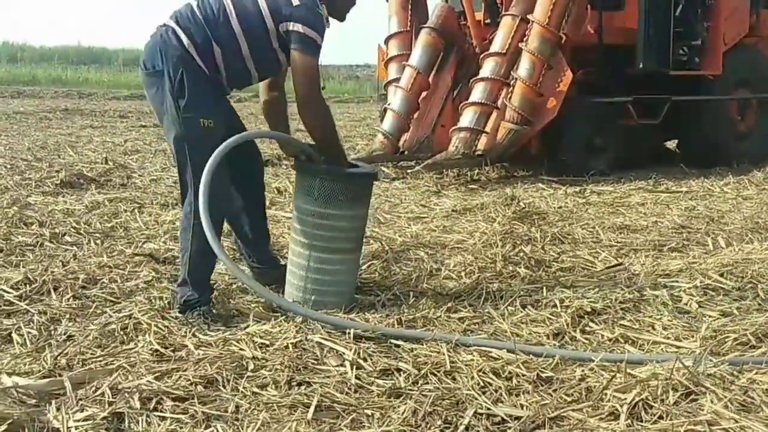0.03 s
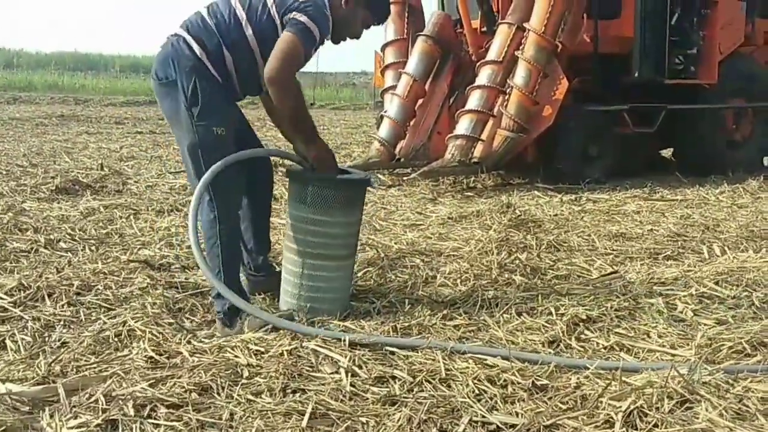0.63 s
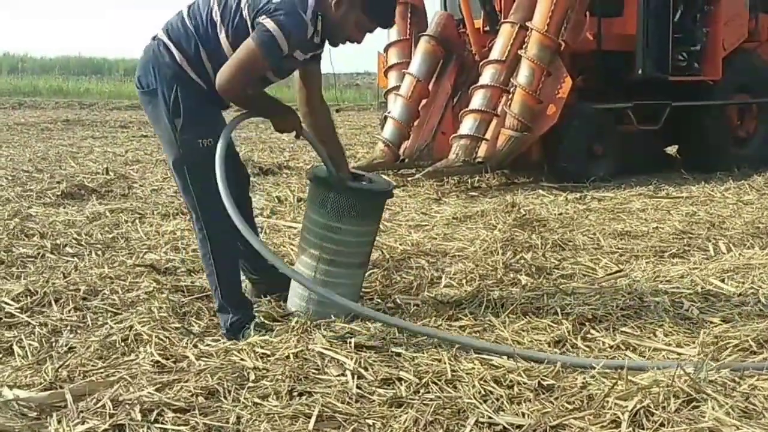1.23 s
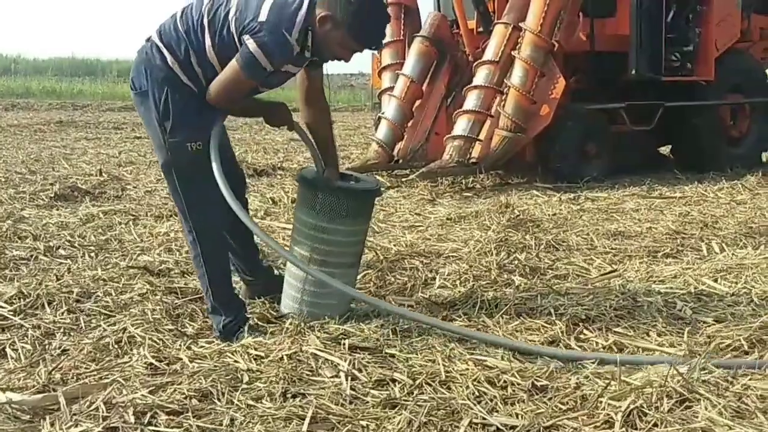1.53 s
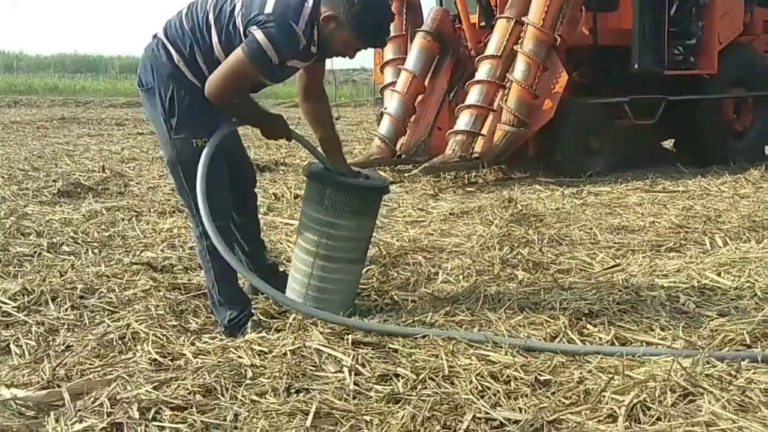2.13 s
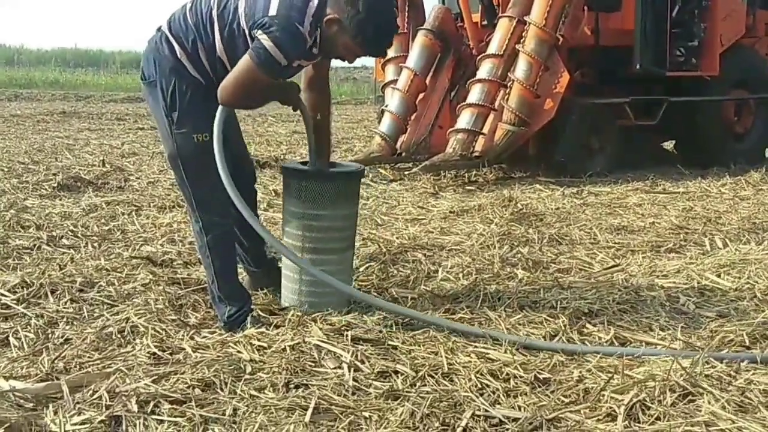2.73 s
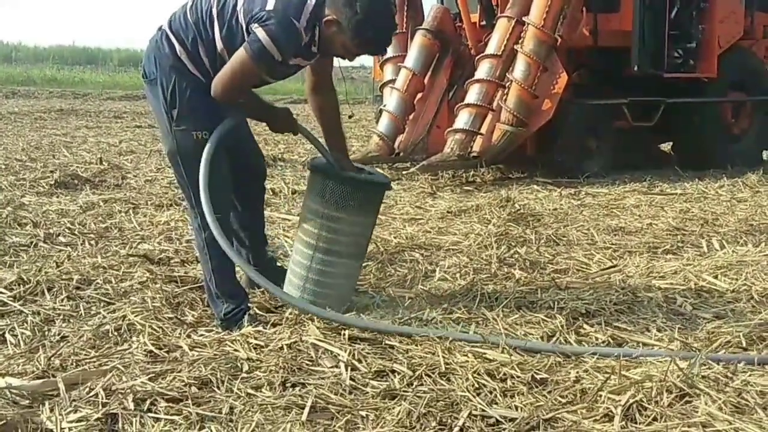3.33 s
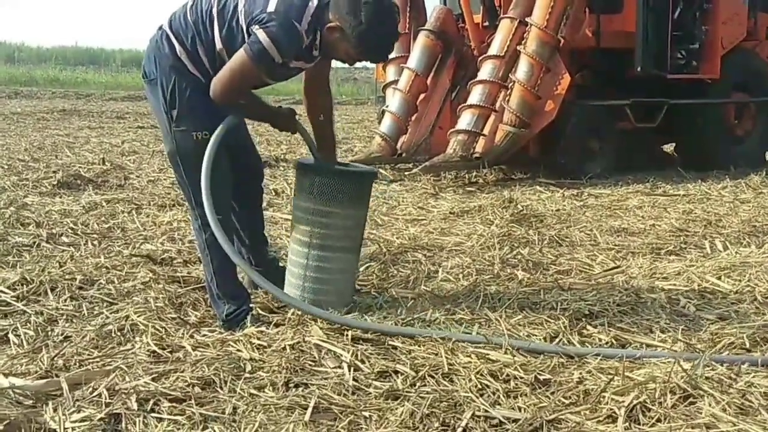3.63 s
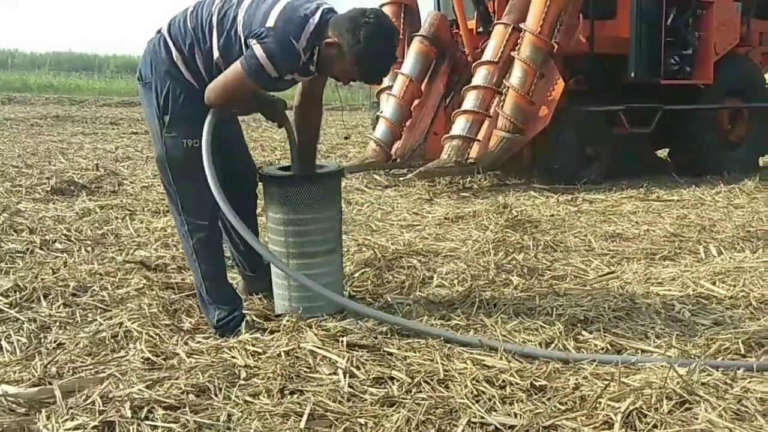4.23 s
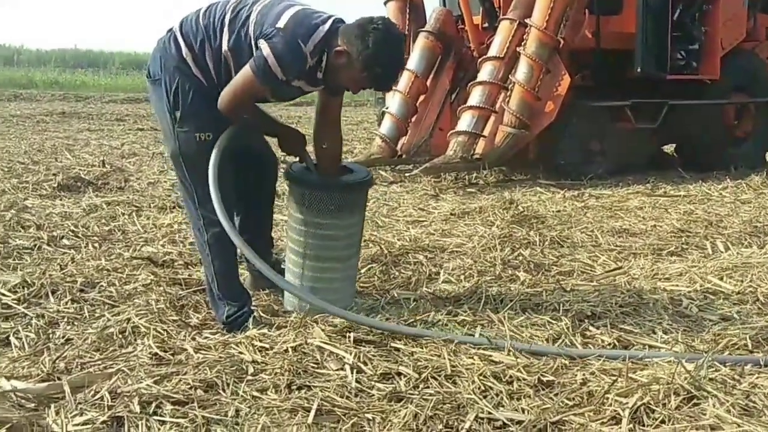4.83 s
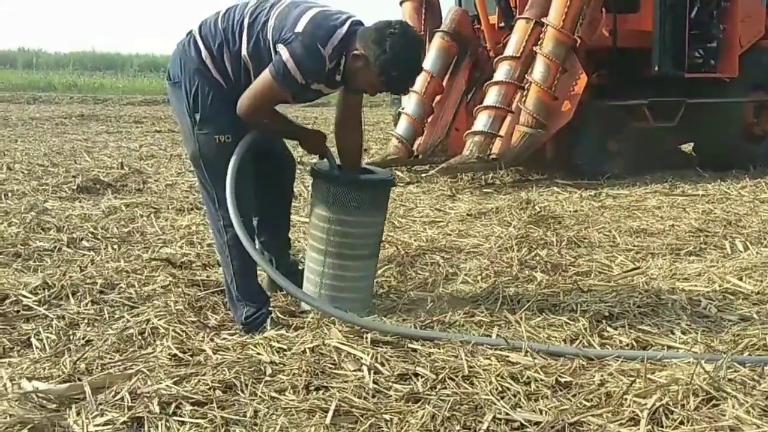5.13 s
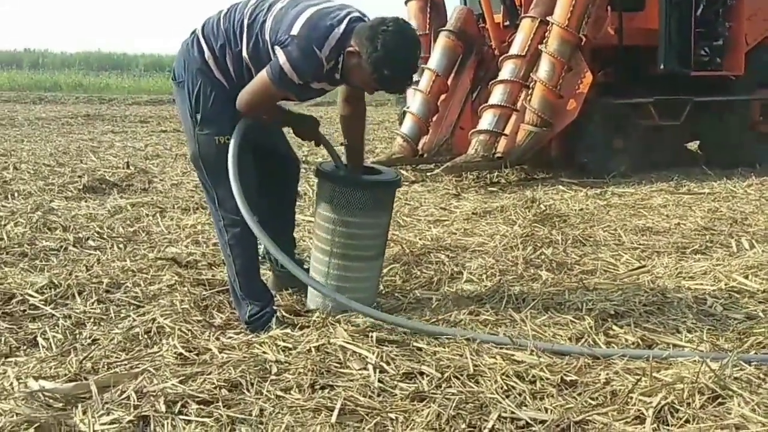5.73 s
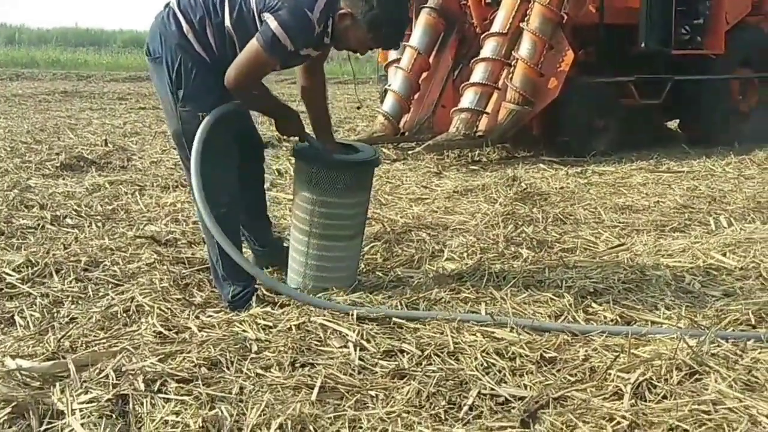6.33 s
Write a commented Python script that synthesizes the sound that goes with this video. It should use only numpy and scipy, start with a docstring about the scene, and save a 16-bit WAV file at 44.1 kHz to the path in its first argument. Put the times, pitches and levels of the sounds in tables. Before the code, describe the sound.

Compressed air hisses loudly through a large cylindrical filter, surging and whistling, while a compressor thumps and a diesel engine idles behind.

```python
"""An air hose blows out a big cylindrical filter in an open field, a few metres away. From the start
a piston compressor thumps and a harvester's six-cylinder diesel idles behind it, and three short low
hoots sound near 610 Hz. The jet hisses on the pleats and surges at 1.2 s. From 1.5 s it whistles in
short, high clusters where it grazes an edge. Near 2.7 s, and again from 4.9 to 5.7 s, it reaches deep
into the drum and the hollow roars. Two last whistles sound at 6.5 s."""
import sys
import numpy as np
from scipy import signal
from scipy.fft import rfft, irfft
from scipy.io import wavfile
from scipy.ndimage import uniform_filter1d, map_coordinates

SR = 44100
rng = np.random.default_rng(int(sys.argv[2]) if len(sys.argv) > 2 else 0)


def wav_out(sig):
    """Save sig, one row per channel (or a flat mono array), as 16-bit PCM at SR to the path in sys.argv[1]."""
    wavfile.write(sys.argv[1], SR, np.round(np.clip(np.atleast_2d(sig).T, -1, 1) * 32767).astype(np.int16))


N = 289737

# Envelopes of the air as the nozzle is worked round the filter; levels in all tables are relative.
HISS_ENVELOPE = [(0.0, -22), (0.44, -28), (1.1, -26), (1.21, -15), (1.3, -20), (1.34, -13.5), (1.92, -20),
                 (2.08, -20.5), (2.18, -26.5), (2.61, -17), (2.67, -21.5), (2.74, -22), (2.84, -14),
                 (3.0, -16.5), (3.11, -24.5), (3.31, -12.5), (3.48, -26), (3.71, -21), (3.9, -23),
                 (3.95, -19), (4.01, -22), (4.06, -16), (4.15, -16), (4.21, -11.5), (4.3, -18), (4.94, -17),
                 (5.01, -22.5), (5.42, -18.5), (5.6, -13.5), (5.74, -16), (5.78, -14.5), (5.86, -19),
                 (5.93, -14), (6.31, -23), (6.5, -17), (6.57, -22.5)]  # jet striking the filter: t/s, level/dB
PLEAT_ENVELOPE = [(0.0, -23), (0.25, -27.5), (1.01, -29.5), (1.34, -21), (1.5, -27.5), (1.63, -23),
                  (2.1, -29.5), (2.27, -28.5), (2.32, -21), (2.38, -24.5), (2.74, -21.5), (2.87, -16),
                  (3.07, -31), (3.15, -30), (3.29, -17.5), (3.44, -27), (4.01, -25.5), (4.04, -20),
                  (4.76, -28), (5.1, -23.5), (5.36, -26), (5.49, -16), (5.6, -21), (6.02, -23), (6.26, -22),
                  (6.57, -28.5)]  # air passing through the pleats: t/s, level/dB
RIM_ENVELOPE = [(0, -6.5), (1.2, -7), (1.4, -13), (2.3, -7.5), (3.3, -9), (4.0, -11.5), (4.3, -6),
                (5.6, -7), (6.57, -8)]  # spill over the rim, against a blend of pleats and hiss: t/s, level/dB
DEPTH_ENVELOPE = [(0.25, -47.5), (1.59, -44.5), (2.25, -53.5), (2.51, -34.5), (2.57, -41.5), (2.74, -28),
                  (2.91, -41.5), (3.54, -56), (3.59, -44), (4.78, -42.5), (4.88, -31), (5.7, -33),
                  (5.87, -46.5), (6.5, -54.5)]  # jet reaching deep into the drum: t/s, level/dB
BUFFET_ENVELOPE = [(0, -25.5), (1.2, -30), (2.4, -32.5), (3.45, -29), (3.9, -24.5), (4.8, -35),
                   (5.25, -25.5), (6.1, -33), (6.57, -36.5)]  # low buffeting: t/s, level/dB

# Spectral densities of the flow noise.
HISS_SPECTRUM = [(3400, -22.5), (3850, -12), (4150, -2), (4450, 0), (4800, -3), (5200, -1), (5700, -2.5),
                 (6200, -1), (7000, -4), (7450, -9), (7900, -25.5), (8500, -46)]  # jet: f/Hz, level/dB
PLEAT_SPECTRUM = [(900, -22.5), (1300, -6.5), (1550, -6), (1950, 0.5), (2250, -1.5), (2550, -1.5),
                  (2850, -10), (3300, -29)]  # rush through the pleats: f/Hz, level/dB
RIM_SPECTRUM = [(2500, -8.5), (2850, -1.5), (3150, 3), (3400, -2.5), (3650, 4), (3900, -2), (4300, -10)]  # spill over the rim: f/Hz, level/dB
HOLLOW_SPECTRUM = [(550, -20), (750, -18), (950, -8), (1100, 0.5), (1300, -6), (1550, 1), (2000, -27.5)]  # upper resonances of the drum: f/Hz, level/dB
DEPTH_SPECTRUM = [(180, -17), (270, -4.5), (360, -9), (480, 1.5), (620, -1.5), (800, -6), (1100, -14.5)]  # lower resonances of the drum: f/Hz, level/dB
BUFFET_SPECTRUM = [(35, -21.5), (65, -6.5), (95, -1.5), (140, 0), (190, -2.5), (300, -16.5)]  # low buffeting: f/Hz, level/dB

# Three low hoots, then the jet's edge whistles:
# start t/s, duration/s, first f/Hz, last f/Hz, level/dB, octave re fundamental/dB
TONES = [ (-.02, 0.064, 620, 607, -26, -27), (0.086, .065, 613, 602, -26.5, -23),
         (.168, 0.062, 600, 600, -30.5, -26), (1.474, 0.037, 2920, 2420, -20, 2),
         (1.496, .028, 3160, 3000, -20.5, 4), (1.523, 0.044, 2680, 2330, -19.5, 3.5),
         (1.547, 0.026, 2870, 2990, -19.5, 4), (1.652, .043, 2200, 2350, -21, -11),
         (1.698, 0.0385, 2380, 2600, -19.5, -1.5), (1.722, 0.058, 2310, 2190, -21.5, -6),
         (1.836, 0.059, 2740, 3030, -26, -7), (1.879, 0.044, 2750, 3180, -17.5, -9),
         (2.963, .034, 2430, 2530, -13.5, -8.5), (3, 0.033, 2250, 2710, -19.5, 1.5),
         (3.027, .026, 3040, 2970, -22.5, 5), (3.049, .045, 2660, 3280, -26, -10.5),
         (3.148, 0.048, 2560, 3220, -26.5, -12), (3.212, .038, 2900, 2680, -17.5, -10),
         (3.728, .055, 2430, 2230, -23.5, -7), (3.78, .065, 2610, 2380, -28, -8),
         (4.555, .046, 2320, 2620, -21, 6), (4.594, 0.043, 2310, 2640, -15.5, -6),
         (4.65, 0.052, 2700, 3000, -23, -8), (6.471, 0.048, 2630, 2430, -19, -3),
         (6.502, 0.069, 2710, 2750, -21, -9)]
# Airy near-whistles, hoots and spits: start t/s, duration/s, centre f/Hz, bandwidth/Hz, level/dB
EDGE_PUFFS = [(-.01, 0.097, 1520, 450, -24.5), (.736, 0.2, 5400, 450, -32.5),
              (0.99, .013, 5770, 900, -25.5), (1.314, .13, 5320, 2370, -17), (1.6, .07, 1130, 400, -29),
              (2.31, .14, 1210, 450, -31.5), (3.924, 0.073, 4580, 650, -22), (4.023, .07, 1650, 260, -22),
              (4.1, 0.14, 1160, 350, -28), (4.352, 0.098, 6160, 300, -25.5),
              (4.451, 0.031, 1540, 200, -25.5), (4.97, 0.31, 1100, 220, -27),
              (5.47, .075, 1230, 170, -27.5), (5.93, 0.1, 6260, 1000, -21.5)]

# Level at which the machines are heard, dipping and recovering: t/s, level/dB
MACHINE_ENVELOPE = [(0.0, -19), (0.09, -18.5), (1.28, -19.5), (1.3, -22.5), (1.72, -25), (2.76, -21.5),
                    (3.02, -24), (3.51, -23), (3.92, -19.5), (4.83, -25.5), (5.4, -20.5), (6.09, -26.5),
                    (6.55, -23.5), (6.57, -23.5)]
# Line spectrum of the compressor's thump: harmonic number of the stroke rate, level/dB
THUMP_HARMONICS = [(1, -29), (2, -35), (3, -19), (4, -14.5), (5, -6), (6, -15), (7, -13.5), (8, -18),
                   (9, -15), (10, -6), (11, 0.5), (12, -12.5), (13, 2.5), (14, -15.5), (15, -36.5),
                   (16, -21), (17, -12.5), (18, -21.5), (19, -34), (20, -39.5), (21, -32.5), (22, -48.5),
                   (23, -36.5), (24, -23), (25, -20), (26, -22.5), (27, -28.5), (28, -35)]
# Spectral density of the mechanical clatter: f/Hz, level/dB
CLATTER_SPECTRUM = [(330, -22.5), (430, -7.5), (520, -18.5), (630, 2.5), (780, -0.5), (880, 4), (1050, -5),
                    (1600, -1), (2400, -8), (3300, -13), (5000, -21.5), (7200, -19), (8400, -50)]

COMPRESSOR_HZ, SHAFT_HZ = 17.0, 27.3  # piston strokes and diesel shaft turns per second


def jet_hiss(hiss_db, neutral_db=-20.5, dulling_db_per_db=0.18):
    """Turbulent jet noise: a free jet is quiet and bright; the harder it strikes, the duller it is."""
    jet = turbulence(HISS_SPECTRUM, flutter_db=0.84, flutter_hz=37)
    jet = wall_reflection(jet, lag_ms=1.31, sway=0.14, strength=0.26)
    lower = signal.sosfiltfilt(signal.butter(5, 5600, fs=SR, output="sos"), jet)
    upper = jet - lower
    tilt = undb(dulling_db_per_db * (neutral_db - hiss_db))
    hiss = (lower / tilt + upper * tilt) / np.sqrt((tilt ** 2 + tilt ** -2) / 2)
    return hiss * undb(hiss_db + 0.38)


def pleat_rush(pleat_db):
    """Flow noise: air forced through the pleats rushes in the middle of the spectrum."""
    rush = turbulence(PLEAT_SPECTRUM, flutter_db=0.63, flutter_hz=64)
    return wall_reflection(rush, lag_ms=2.582, sway=0.21, strength=0.38) * undb(pleat_db + 0.9)


def wall_reflection(direct, lag_ms, sway, strength):
    """Comb filtering: the drum wall's echo interferes with the direct sound; its path slowly drifts."""
    lag_samples = lag_ms / 1000 * SR * np.exp(sway * walk(1.2))
    echo = map_coordinates(direct, [np.arange(N) - lag_samples], order=3, mode="reflect")
    return unit(direct + strength * echo)


def rim_spill(pleat_db, hiss_db):
    """Edge noise: air spills over the rim, its level following both pleats and hiss."""
    spill_db = between(pleat_db, hiss_db, share=0.34) + envelope(RIM_ENVELOPE)
    return turbulence(RIM_SPECTRUM, flutter_db=1.5, flutter_hz=65) * undb(spill_db)


def drum_roar(pleat_db):
    """Cavity resonance: the deeper the jet reaches, the more the drum roars, most in its low modes."""
    depth_db = envelope(DEPTH_ENVELOPE)
    hollow_db = between(pleat_db, depth_db, share=0.34)
    upper = turbulence(HOLLOW_SPECTRUM, flutter_db=0.5, flutter_hz=37) * undb(hollow_db)
    lower = turbulence(DEPTH_SPECTRUM, flutter_db=0.5, flutter_hz=35) * undb(depth_db + 3.0)
    return upper + lower


def buffeting():
    """Slow pressure fluctuations in the stirred air are heard as a low rumble."""
    rumble = turbulence(BUFFET_SPECTRUM, flutter_db=1.2, flutter_hz=12)
    return rumble * undb(envelope(BUFFET_ENVELOPE) - 0.6)


def hoots_and_whistles():
    """Gliding tones: low hoots, then edge tones, in which a grazing jet locks into oscillation."""
    out, t = np.zeros(N), clock()
    unrest, flutter = walk(1400), undb(3.5 * walk(300))
    for start, length, first_hz, last_hz, db, octave_db in TONES:
        on = (t >= start) & (t < start + length)
        progress = (t[on] - start) / length
        arch = np.sin(np.pi * progress).clip(0)
        hz = (first_hz + (last_hz - first_hz) * progress) * (1 + 0.01 * arch)  # the glide bows upward
        jitter = 0.032 / (1 + 2 * undb(octave_db) ** 2)  # the stronger the octave, the steadier the pitch
        phase = 2 * np.pi * np.cumsum(hz * (1 + jitter * unrest[on])) / SR
        swell = np.sqrt(2 * arch) * flutter[on]
        out[on] += undb(db - 2.0) * swell * (np.sin(phase) + undb(octave_db) * np.sin(2 * phase))
    return out


def hiss_loss_db(full_loss_db=2.5):
    """Attenuation: the hiss dips while a hoot or whistle sounds."""
    t = clock()
    sounding = np.any([(t >= start) & (t < start + length) for start, length, *_ in TONES], axis=0)
    return full_loss_db * uniform_filter1d(sounding.astype(float), size=1300)


def edge_puffs():
    """Narrow-band noise: a jet that only brushes an edge fails to lock into a tone."""
    out, t = np.zeros(N), clock()
    for start, length, hz, width_hz, db in EDGE_PUFFS:
        band = signal.butter(4, [hz - width_hz / 2, hz + width_hz / 2], "bandpass", fs=SR, output="sos")
        progress = ((t - start) / length).clip(0, 1)
        swell = np.sqrt(2 * np.sin(np.pi * progress).clip(0))
        out += undb(db) * swell * unit(signal.sosfilt(band, rng.standard_normal(N)))
    return out


def compressor(machine_db, first_stroke_s=0.0335):
    """Impulse response: each piston cycle gives a thump and, half a cycle later, an opposite-sign rebound, both
    ringing down in the intake pipe."""
    size = 1024  # points per stroke
    harmonics = np.arange(size // 2 + 1)
    harmonic_db = np.interp(harmonics, *np.transpose(THUMP_HARMONICS), left=-50, right=-55)
    # minimum phase: the pipe is causal, so its phases follow from its levels
    cepstrum = irfft(np.log(undb(harmonic_db)))
    cepstrum[1:size // 2] *= 2
    cepstrum[size // 2 + 1:] = 0
    phase_lag = 0.05 * np.maximum(harmonics - 12, 0) ** 2  # the upper ring builds up a little later
    stroke = irfft(np.exp(rfft(cepstrum) - 1j * phase_lag))
    turns = COMPRESSOR_HZ * (clock() - first_stroke_s + 0.000085 * walk(9))
    thumps = -unit(np.interp(turns % 1, np.arange(size) / size, stroke, period=1))
    return thumps * undb(machine_db + 0.37 + 0.5 * walk(25))


def diesel(machine_db, first_firing_s=0.0058, first_squeak_s=0.0017):
    """Periodic excitation: three firings a turn drone and pulse the clatter; each turn squeaks once."""
    t = clock()
    firing_phase = 2 * np.pi * 3 * SHAFT_HZ * (t - first_firing_s)
    drone = np.sin(firing_phase) * undb(-11.0 + 1.2 * walk(6))
    # part of the clatter comes back the same on every compressor stroke
    repeating = np.resize(rng.standard_normal(N)[:int(SR / COMPRESSOR_HZ)], N)
    knocks = rng.standard_normal(N) * (1 + 0.64 * np.cos(firing_phase) + 0.32 * np.cos(firing_phase / 3))
    clatter = colour(0.63 * repeating + knocks, CLATTER_SPECTRUM) * undb(-11.5)
    from_squeak_s = ((SHAFT_HZ * (t - first_squeak_s) + 0.5) % 1 - 0.5) / SHAFT_HZ
    squeak = np.exp(-(from_squeak_s / 0.0023) ** 2) * np.sin(2 * np.pi * 3570 * t + walk(300))
    return (drone + clatter) * undb(machine_db) + squeak * undb(machine_db - 4.5 + 2.2 * walk(25))


def turbulence(spectrum, flutter_db, flutter_hz):
    """Amplitude modulation: coloured flow noise flutters with the eddies; rms 1."""
    return unit(colour(rng.standard_normal(N), spectrum) * undb(flutter_db * walk(flutter_hz)))


def colour(x, spectrum):
    """Spectral shaping by (f/Hz, level/dB) points, falling 55 dB an octave beyond both ends; rms 1."""
    hz, db = np.transpose(spectrum)
    octave, known = np.log2(np.arange(N // 2 + 1) * SR / N + 1), np.log2(hz)
    beyond = np.abs(octave - np.clip(octave, known[0], known[-1]))
    gain = undb(np.interp(octave, known, db) - 55 * beyond)
    return unit(irfft(rfft(x) * gain, N))


def walk(rate_hz):
    """Low-pass noise: a smooth fluctuation that changes about rate_hz times a second; rms 1."""
    width = max(int(SR / rate_hz), 1)
    smoothed = uniform_filter1d(rng.standard_normal(N), width, mode="wrap")
    return unit(uniform_filter1d(smoothed, width, mode="wrap"))


def envelope(table):
    """Linear interpolation of (t/s, level/dB) points to every sample."""
    return np.interp(clock(), *np.transpose(table))


def between(first_db, second_db, share):
    """Weighted mean: the level that lies the given share of the way from first to second."""
    return first_db + share * (second_db - first_db)


def undb(db):
    """Level in decibels to amplitude ratio."""
    return 10 ** (np.asarray(db) / 20)


def unit(x):
    """Normalisation to rms 1."""
    return x / np.sqrt(np.mean(x ** 2))


def clock():
    """Time of every sample, s."""
    return np.arange(N) / SR


def scene():
    """Superposition in a free field: on open ground the sources add without reverberation."""
    hiss_db = envelope(HISS_ENVELOPE) - hiss_loss_db()
    pleat_db, machine_db = envelope(PLEAT_ENVELOPE), envelope(MACHINE_ENVELOPE)
    air = jet_hiss(hiss_db) + pleat_rush(pleat_db) + rim_spill(pleat_db, hiss_db)
    air += drum_roar(pleat_db) + buffeting()
    return (air + hoots_and_whistles() + edge_puffs() + compressor(machine_db) + diesel(machine_db))[None]


def record(dry, ceiling=0.82, cutoff_hz=8350):
    """Soft saturation rounds the highest peaks; a steep low-pass removes what lies above the hiss."""
    rounded = dry / (1 + (dry / ceiling) ** 8) ** (1 / 8)
    return signal.sosfilt(signal.ellip(10, 0.1, 90, cutoff_hz, fs=SR, output="sos"), rounded)


dry = scene()
out = record(dry)
wav_out(out)
```